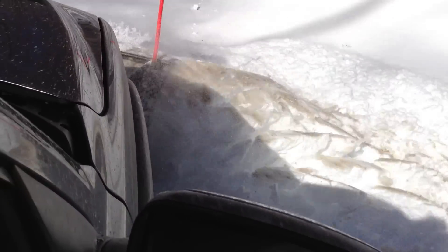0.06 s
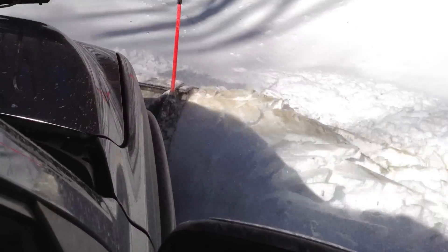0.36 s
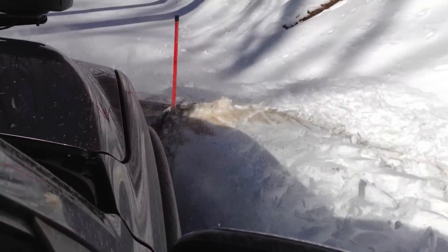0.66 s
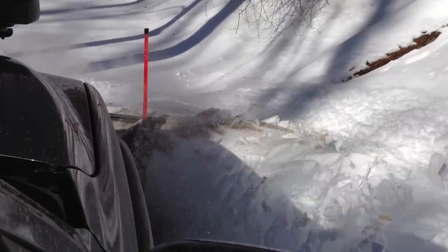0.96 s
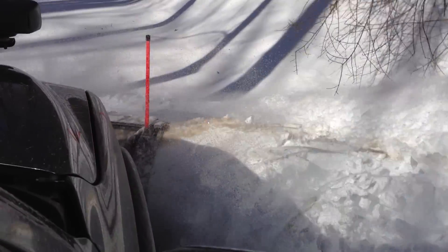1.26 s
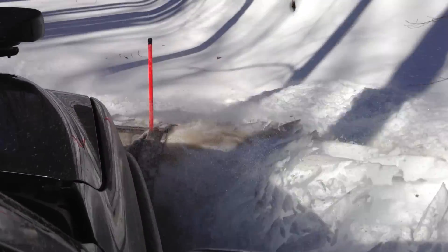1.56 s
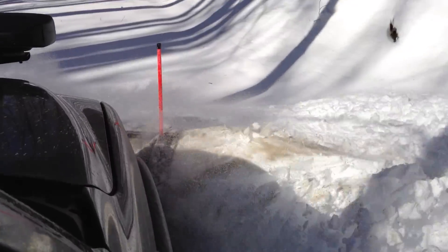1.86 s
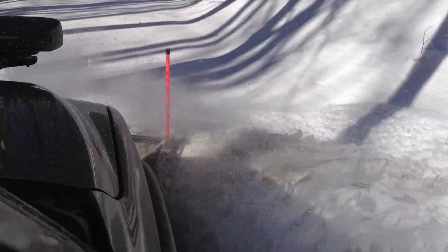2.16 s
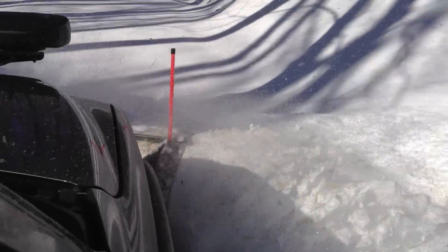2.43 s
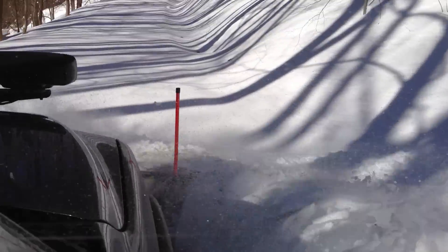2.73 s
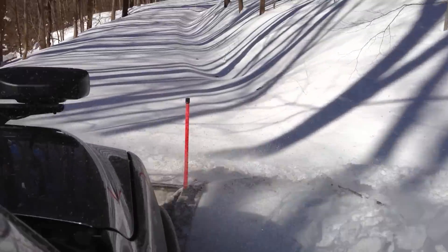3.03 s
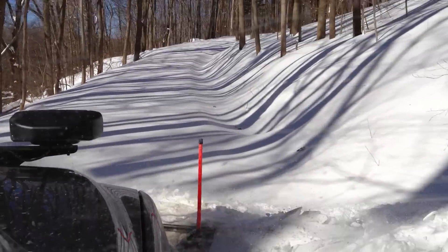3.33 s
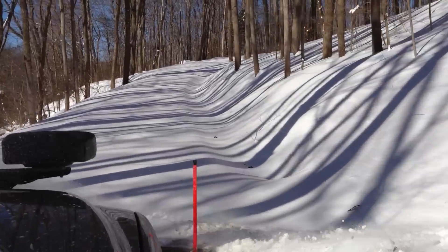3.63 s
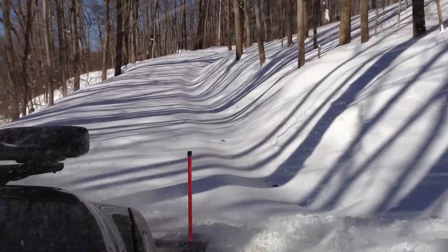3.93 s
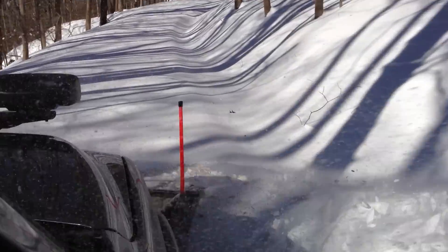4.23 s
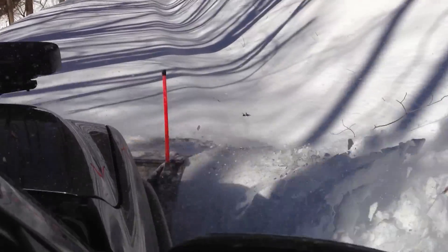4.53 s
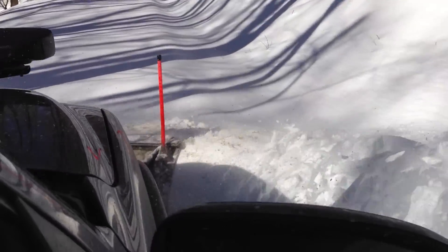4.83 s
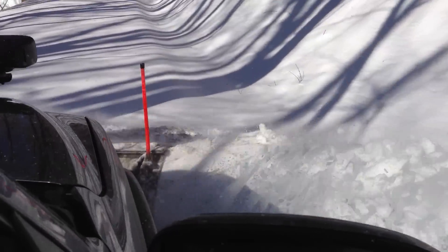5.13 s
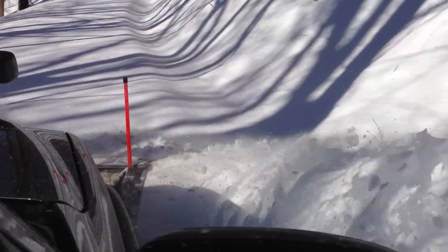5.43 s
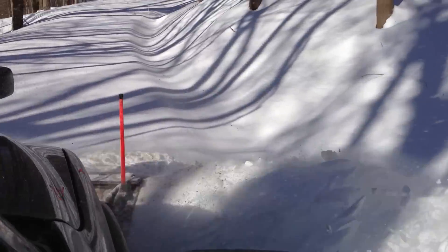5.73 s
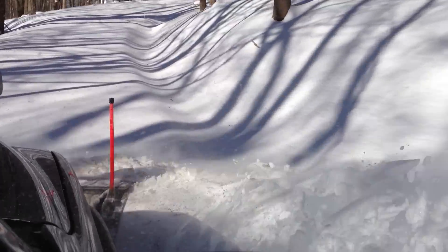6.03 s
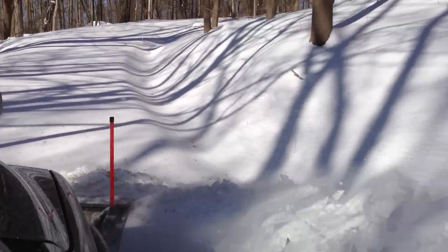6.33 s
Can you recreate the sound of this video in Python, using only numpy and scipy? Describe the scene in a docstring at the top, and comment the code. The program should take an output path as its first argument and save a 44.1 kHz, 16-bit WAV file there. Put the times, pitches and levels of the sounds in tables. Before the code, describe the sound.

A diesel pickup pushes snow, heard outdoors from its open side window. The engine drones and clatters under a faint, very high turbo whistle, while snow hisses and crumbles steadily off the blade. Wind rumbles and puffs on the microphone throughout. Midway the engine speeds up and flung bits of ice click sharply on the microphone. Near the end the drone swells under load, with a low thud.

```python
"""A diesel pickup pushes snow along a track, heard from its open side window.
The engine drones and clatters under a rising turbo whistle; jolts thud through the body.
Snow rushes and crumbles off the blade. Air buffets the microphone, flung ice grains and
clods tick on it, and a limiter ducks after each hard peak."""
import sys
import numpy as np
from scipy import signal
from scipy.fft import rfft, irfft
from scipy.io import wavfile
from scipy.ndimage import uniform_filter1d, minimum_filter1d

SR = 44100
rng = np.random.default_rng(int(sys.argv[2]) if len(sys.argv) > 2 else 0)


def transcribe(signal):
    """Save signal, clipped to [-1, 1], as a 16-bit WAV file at the path in sys.argv[1]."""
    frames = np.atleast_2d(signal).T
    limited = np.clip(frames, -1, 1)
    pcm = np.round(limited * 32767).astype(np.int16)
    wavfile.write(sys.argv[1], SR, pcm)


N = 290619
TIME = np.arange(N) / SR

# air flow past the window: t/s, level/dB
AIRFLOW = [(0, -25), (0.3, -22.5), (0.85, -23.5), (1.5, -26.5), (1.75, -22.5), (2.2, -25), (2.5, -27.5),
           (2.75, -23), (3.15, -22), (3.65, -18.5), (3.95, -20), (4.28, -24), (4.38, -20.5), (4.5, -17.5),
           (4.62, -22.5), (4.85, -23), (5.35, -17), (5.72, -16.5), (5.85, -19), (6.59, -16)]


def engine(wobble=0.0045):
    """Eight-cylinder diesel: one wavering firing rate drives drone and clatter."""
    # engine run: t/s, firing rate/Hz, drone level/dB, clatter level/dB
    run = [(0, 128.1, -30.5, -31), (1.25, 129.8, -29, -35.5), (1.6, 130.5, -30.5, -36.5),
           (2.3, 130.8, -32, -34), (2.8, 141.5, -29, -35), (3.4, 149.6, -26.5, -32.5),
           (3.78, 148.3, -22.5, -33.5), (3.94, 146.3, -29, -35), (4.3, 144, -31.5, -31.5),
           (4.7, 145.6, -32, -30), (5.02, 150.6, -20, -29), (5.2, 152.6, -23, -33),
           (5.48, 154.3, -17, -28.5), (5.74, 155, -13, -26), (5.95, 156, -17.5, -33.5),
           (6.17, 152.9, -15.5, -29), (6.38, 149.7, -22, -33), (6.59, 147.9, -23, -39)]
    firing_hz, drone_db, clatter_db = in_time(run)
    firings = np.cumsum(firing_hz * (1 + wobble * drift(7.84))) / SR
    return drone(firings, drone_db) + from_db(clatter_db) * clatter(firings, firing_hz)


def drone(firings, level_db, full_load_db=-12.5, boom_hz=178.7, boom_width_hz=69):
    """Low exhaust orders over a booming cab; under heavy load the boom yields to the note."""
    # exhaust and crank tones: f/firing rate, level/dB
    orders = [(.875, -16), (1, 0), (1.125, -22), (1.25, -11), (1.5, -17), (1.75, -15), (2, -19)]
    tones = sum(from_db(db + 1.5 * drift(5)) * np.sin(2 * np.pi * (order * firings + rng.random()))
                for order, db in orders)
    cab = resonate_twice(rng.standard_normal(N), boom_hz, boom_width_hz)
    load_db = level_db - full_load_db
    note_db = 3 + 1.8 * drift(14) + 0.45 * load_db
    boom_db = 4 - 0.45 * np.maximum(load_db + 10, 0)
    note = from_db(note_db) * rms_one(tones)
    boom = from_db(boom_db) * rms_one(cab) * lulls()
    return from_db(level_db) * (note + boom)


def clatter(firings, firing_hz, cylinders=8, repeat_share=0.55, decay_per_firing=0.88, size=512):
    """Each cylinder knocks with its own strength and grain, ringing block and panels; unit power."""
    # block and panel resonances: f/Hz, width/Hz, level/dB
    modes = [(672, 63, 11), (874, 160, 5.5), (1425, 86, 10), (1517, 200, 6), (1756, 51, 9),
             (2387, 92, -1.5), (2757, 140, 4.5), (3070, 220, 0.5), (4470, 1900, -10.5)]
    cylinder = firings.astype(int) % cylinders
    age_samples = np.minimum((firings % 1 / firing_hz * SR).astype(int), size - 1)
    own = rng.standard_normal((cylinders, size))[cylinder, age_samples]
    strength = from_db(3.5 * rng.standard_normal(cylinders))[cylinder]
    grain = np.sqrt(repeat_share) * own + np.sqrt(1 - repeat_share) * rng.standard_normal(N)
    knocks = strength * grain * np.exp(-decay_per_firing * (firings % 1))
    return rms_one(sum((-1) ** k * from_db(db + 2.2 * drift(0.8)) * resonate(knocks, hz, width_hz)
                       for k, (hz, width_hz, db) in enumerate(modes)))


def turbo(hiss_db=-54.5, fade_depth=0.5, fades_per_s=9):
    """The compressor's blade tone blurs with speed and fades in moving air, over intake hiss."""
    # blade tone: t/s, f/Hz
    blade_tone = [(0.0, 9231), (1.15, 10065), (1.85, 9948), (2.29, 10011), (2.62, 10284), (3.41, 11565),
                  (3.78, 11852), (4.15, 10911), (4.29, 10877), (4.42, 11083), (5.17, 13122), (5.51, 13986),
                  (5.82, 14481), (6.0, 14634), (6.17, 14568), (6.59, 14094)]
    # whistle surges: t/s, level/dB
    surges = [(0, -49), (0.29, -58), (0.42, -49), (0.62, -59), (0.87, -43), (1.0, -51), (1.5, -58),
              (1.85, -51), (2.25, -59), (2.49, -61), (2.53, -44), (2.62, -50), (2.74, -56), (3.08, -48),
              (3.4, -53), (3.77, -45), (3.92, -51), (4.28, -47), (4.36, -57), (4.51, -46), (4.58, -52),
              (4.72, -45), (4.8, -56), (4.86, -47), (4.97, -49), (5.3, -54), (5.8, -56), (6.15, -53),
              (6.5, -49)]
    hz, = in_time(blade_tone)
    level_db, = in_time(surges)
    blur = 0.00106 * (hz / hz.min()) ** 1.8 * drift(67)
    phase = 2 * np.pi * np.cumsum(hz * (1 + blur)) / SR
    in_phase = (1 + fade_depth * drift(fades_per_s)) * np.sin(phase)
    quadrature = fade_depth * drift(fades_per_s) * np.cos(phase)
    intake = rms_one(resonate(rng.standard_normal(N), 13400, 3200)) * hz / hz.max()
    return from_db(level_db) * rms_one(in_phase + quadrature) + from_db(hiss_db) * intake


def snow(gain_db=-4.0, crumble_db=-6.0, snaps_per_s=1500):
    """Powder hisses along the blade while the crust breaks in surges of tiny snaps."""
    # snow on the blade: t/s, level/dB
    rush = [(0, -28), (0.4, -27), (0.75, -28.5), (1.29, -26), (1.335, -25), (1.36, -27.5), (1.5, -28.5),
            (2.0, -28), (2.3, -28), (2.75, -26), (3.1, -25.5), (3.55, -24.5), (3.95, -27.5), (4.28, -23.5),
            (4.4, -27.5), (4.75, -26), (5.3, -27.5), (5.55, -26), (5.72, -26.5), (5.85, -27.5),
            (6.35, -29.5), (6.59, -29)]
    # snow spectrum: f/Hz, level/dB
    spectrum = [(300, 4.5), (1000, 7.5), (1600, 5), (2150, 1.5), (2850, 2), (3600, -4), (4900, -4),
                (6500, -11), (9000, -16), (12500, -20.5), (15500, -28)]
    rush_db, = in_time(rush)
    surge_db = 2 * drift(14)
    breaks = rng.random(N) < snaps_per_s * from_db(surge_db) / SR
    sizes = from_db(0.3 * surge_db + 2.2 * np.minimum(rng.exponential(1, N), 4))
    snaps = breaks * sizes * rng.choice([-1, 1], N)
    powder = rng.standard_normal(N) * from_db(0.98 * drift(44))
    return from_db(rush_db + gain_db) * colour(powder + from_db(crumble_db) * rms_one(snaps), spectrum)


def wind(gain_db=-2.5, crunch_db=-15.5):
    """The finest eddies make a lumpy rumble with lulls; the strongest lumps crunch."""
    # rumble spectrum: f/Hz, level/dB
    spectrum = [(25, -39), (60, -38), (90, -13), (125, -4.5), (185, -7.5), (260, 0), (370, -3.5), (520, -3),
                (750, -7.5), (1100, -19), (1600, -23.5), (3000, -60)]
    wind_db, = in_time(AIRFLOW)
    lumps = from_db(2.5 * np.minimum(drift(40), 1.5))
    rumble = colour(rng.standard_normal(N) * lumps * lulls(), spectrum)
    crunch = resonate_twice(rng.standard_normal(N) * lumps ** 2, hz=1100, width_hz=1300)
    return from_db(wind_db + gain_db) * (rumble + from_db(crunch_db) * rms_one(crunch))


def buffets(gain_db=-9.5, rise_ratio=0.82, hollow=0.55, rasp_db=-28.5, size=4096):
    """Each eddy is a hollow swell round one pressure kick; strong ones rasp at their crests."""
    # large eddies striking the microphone: t/s, level/dB, nominal length/s, f/Hz
    large_eddies = [(0.006, 1, 0.0055, 368), (0.11, -2, 0.0068, 198), (0.213, -10, 0.0091, 292),
                    (0.234, -6.5, 0.0072, 327), (0.268, -2, 0.002, 600), (0.303, -8, 0.0054, 760),
                    (0.338, -6, 0.015, 300), (0.388, -5, 0.011, 460), (0.473, -0.5, 0.0066, 216),
                    (0.5, -1, 0.0096, 237), (0.583, -5.5, 0.033, 207), (0.656, -0.5, 0.011, 300),
                    (0.763, -7, 0.016, 403), (0.818, -6.5, 0.0089, 363), (1.005, -5.5, 0.0032, 410),
                    (1.133, -5.5, 0.007, 586), (1.24, -8, 0.018, 408), (1.318, -14, 0.012, 510),
                    (1.332, 2.5, 0.012, 280), (1.406, -8, 0.024, 393), (1.476, 2.5, 0.008, 340),
                    (1.573, -0.5, 0.0058, 193), (1.662, 1, 0.0035, 324), (1.804, -2, 0.013, 445),
                    (1.863, -7, 0.0065, 448), (1.882, -8.5, .016, 250), (1.965, -2.5, 0.004, 314),
                    (1.977, -2, 0.005, 388), (2.01, 0.5, 0.01, 248), (2.041, -5, 0.007, 397),
                    (2.072, -4.5, 0.015, 464), (2.159, 2, 0.0049, 537), (2.292, -6, 0.019, 344),
                    (2.39, -7, 0.018, 340), (2.417, -4.5, 0.012, 250), (2.618, -8, 0.0075, 504),
                    (2.677, -4.5, 0.016, 490), (2.713, -7, .016, 506), (2.755, 0, 0.0043, 226),
                    (2.808, -10.5, 0.011, 560), (2.855, 1.5, 0.012, 270), (2.929, -3.5, 0.0049, 650),
                    (2.988, -6.5, 0.011, 314), (3.003, -7.5, 0.015, 517), (3.05, -22, 0.0081, 360),
                    (3.115, 4, 0.014, 342), (3.249, -1.5, 0.023, 282), (3.333, -1.5, 0.0068, 480),
                    (3.35, 4, 0.011, 374), (3.412, -3.5, 0.0089, 520), (3.459, 1.5, 0.011, 426),
                    (3.483, -4, 0.013, 550), (3.539, -2.5, 0.015, 470), (3.631, 0, 0.0092, 296),
                    (3.7, -0.5, 0.0081, 362), (3.726, -7, 0.0083, 300), (3.789, -3, 0.016, 264),
                    (3.864, -3.5, 0.014, 237), (3.997, -1.5, 0.017, 408), (4.085, -0.5, 0.012, 224),
                    (4.123, -4.5, 0.0055, 260), (4.144, -4.5, 0.0058, 750), (4.162, -0.5, 0.021, 250),
                    (4.21, -0.5, 0.029, 220), (4.255, -0.5, 0.024, 350), (4.309, 0.5, 0.021, 232),
                    (4.332, 8.5, 0.0042, 394), (4.418, -7, 0.017, 200.2), (4.698, -4, 0.013, 520),
                    (4.755, -2, 0.016, 192), (4.904, 2.5, 0.0091, 340.6), (4.984, -4, 0.017, 257),
                    (5.017, 0, 0.009, 201.1), (5.049, -15, 0.019, 300), (5.134, 6.5, 0.013, 230),
                    (5.263, 4, 0.0062, 402), (5.303, -7, 0.0076, 239), (5.363, 5.5, 0.009, 290),
                    (5.51, 3, 0.01, 203), (5.528, 2.5, 0.0087, 257.4), (5.567, 0, .009, 240.3),
                    (5.618, 0, 0.014, 245.1), (5.674, 1, 0.0048, 362), (5.74, 4.5, 0.011, 225),
                    (5.766, 6.5, 0.0088, 516), (5.84, 4.5, 0.022, 184.2), (5.889, 4, 0.018, 198),
                    (5.954, 2, 0.0062, 362.2), (5.995, 1.5, 0.012, 300), (6.077, -2, 0.012, 237),
                    (6.143, 7, 0.011, 178), (6.18, 6.5, 0.013, 177), (6.219, 0.5, 0.008, 300),
                    (6.269, -3, 0.0091, 340), (6.367, 3.5, 0.013, 348.8), (6.455, -5, 0.015, 418.4),
                    (6.575, -4.5, 0.0066, 400)]
    # eddy spectrum: f/Hz, level/dB
    spectrum = [(25, -38), (70, -50), (105, -7.5), (160, 1.5), (220, 3), (380, -5.5), (520, -6.5),
                (750, -16), (1100, -21.5), (1550, -26.5), (2200, -33.5), (4500, -41.5), (12000, -103)]
    out = np.zeros(N + 2 * size)
    t = (np.arange(size) - size // 2) / SR
    for at_s, level_db, length_s, hz in large_eddies + small_eddies():
        tilt = 1.5 + 4.5 * np.log2(hz / 300) + 0.043 * level_db  # higher or stronger: brighter
        width_s = 0.97 * length_s * np.where(t < 0, rise_ratio, 1)
        swirl = rng.standard_normal(size) / (1 + (t / width_s) ** 2) ** 2
        churn = colour(swirl, spectrum, tilt)
        kick = colour(rng.choice([-1, 1]) * (t == 0), spectrum, tilt - 3)
        puff = rms_one(churn + 0.52 * (0.011 / length_s) ** 0.72 * kick)  # shorter: more kick
        puff += hollow * rms_one(resonate(puff, hz, 0.25 * hz))
        puff = from_db(level_db + gain_db) * rms_one(puff) * np.sqrt(length_s * SR / size)
        rasp_noise = rms_one(resonate(rng.standard_normal(size), 1280, 570))
        rasp = from_db(rasp_db) * puff * np.tanh(2 * puff) * rasp_noise
        start = int(at_s * SR) + size // 2
        out[start:start + size] += puff + rasp
    return out[size:size + N]


def small_eddies(count=36, spread_db=10.0, mid_length_s=0.0085, mid_hz=300, spread_octaves=0.6):
    """Eddies shed at loose intervals, stronger in stronger wind: t/s, level/dB, length/s, f/Hz."""
    wind_db, = in_time(AIRFLOW)
    place, strength, length, pitch = rng.random((count, 4)).T
    at_s = (np.arange(count) + place) / count * N / SR
    flow_db = wind_db.mean() + 0.4 * (np.interp(at_s, TIME, wind_db) - wind_db.mean())
    level_db = flow_db + 1.5 + spread_db * (2 * strength - 1)
    hz = mid_hz * 2 ** (spread_octaves * (2 * pitch - 1))
    return list(zip(at_s, level_db, mid_length_s * (0.5 + length), hz))


def ticks(size=256):
    """A grain gives one push and pull of pressure, shorter if smaller, gritty as it shatters."""
    # ice grains and clods striking the microphone: t/s, peak level/dB, f/Hz, grit share
    strikes = [(0.267, -15, 900, .03), (0.303, -20, 1190, .05), (0.656, -13, 900, .03),
               (1.238, -14, 1300, .03), (1.332, -12, 2630, .03), (1.338, -14.5, 2890, .03),
               (1.4057, -9, 1490, .03), (1.864, -14, 895, .05), (2.158, -18, 1000, .03),
               (3.3872, -1, 2580, 0.039), (3.4495, -12, 5500, .07), (3.478, -0.5, 1140, .02),
               (3.485, 8.5, 1580, 0.03), (3.6867, -3.5, 6400, 0.059), (3.6868, -2, 2430, 0.066),
               (3.942, -19, 5000, .07), (4.035, -11, 4600, .3), (4.144, -5.5, 2660, .02),
               (4.144, -10.5, 1100, .02), (4.1505, -10, 4200, .05), (4.333, -1, 1720, .01),
               (4.352, -13, 6950, .1), (4.379, -18, 6520, .1), (4.521, -6.5, 2580, .03),
               (4.537, 10.5, 3090, .16), (4.542, 2.5, 1498, .02), (4.6173, -2.5, 2560, .02),
               (4.903, -8, 900, .03), (5.263, -10, 900, .03), (5.363, -10, 998, 0.037),
               (5.652, -7.5, 2720, .03), (5.7663, 3, 1080, 0.02), (5.769, -6, 1500, 0.027),
               (6.4903, 8, 3070, .2)]
    out = np.zeros(N)
    for at_s, peak_db, hz, grit in strikes:
        phase = 2 * np.pi * hz * (np.arange(size) - size // 2) / SR
        pulse = phase * np.exp(-phase ** 2 / 2)
        pulse += grit * rng.standard_normal(size) * np.exp(-np.abs(phase) / 2)
        start = int(at_s * SR) - size // 2
        out[start:start + size] -= from_db(peak_db) * pulse / np.abs(pulse).max()
    return out


def jolts(hz=86, half_width_s=0.01, waver=0.071):
    """Each jolt shakes the body for a few slow cycles."""
    # body thuds: t/s, level/dB
    thuds = [(0.43, -38), (0.57, -37), (2.698, -37), (2.85, -35), (3.12, -30), (4.3, -38), (5.47, -32),
             (5.595, -19), (6.18, -32), (6.44, -35)]
    swell = sum(from_db(db) * np.exp(-((TIME - at_s) / half_width_s) ** 2) for at_s, db in thuds)
    phase = 2 * np.pi * np.cumsum(hz * (1 + waver * drift(22))) / SR
    return swell * np.sqrt(2) * np.sin(phase)


def lulls(depth_db=3.0, rate_hz=12):
    """A gain that sinks and swells at random; unit power."""
    return rms_one(from_db(depth_db * np.minimum(drift(rate_hz), 1)))


def drift(rate_hz):
    """Smooth unit-power noise that changes about rate_hz times a second."""
    hop, settle = 40, 2000
    pole = np.exp(-2 * np.pi * hop * rate_hz / SR)
    noise = rng.standard_normal(N // hop + settle + 2)
    slow = signal.lfilter([1], [1, -2 * pole, pole ** 2], noise)[settle:]
    return np.interp(np.arange(N) / hop, np.arange(len(slow)), rms_one(slow))


def colour(x, spectrum, tilt_db_per_octave=0):
    """Shape x by a spectrum, tilted between 150 and 1200 Hz; unit power."""
    octave = np.log2(np.fft.rfftfreq(len(x), 1 / SR) + 1)
    hz, db = np.transpose(spectrum)
    shape_db = np.interp(octave, np.log2(hz), db)
    shape_db += tilt_db_per_octave * np.clip(octave, np.log2(150), np.log2(1200))
    return rms_one(irfft(rfft(x) * from_db(shape_db), len(x)))


def resonate(x, hz, width_hz):
    """Two-pole resonance, unit peak gain."""
    radius = np.exp(-np.pi * width_hz / SR)
    feedback = [1, -2 * radius * np.cos(2 * np.pi * hz / SR), radius ** 2]
    return signal.lfilter(np.array([1, 0, -1]) * (1 - radius ** 2) / 2, feedback, x)


def resonate_twice(x, hz, width_hz):
    """Two equal resonances in series."""
    return resonate(resonate(x, hz, width_hz), hz, width_hz)


def in_time(rows):
    """Each value column of a time table, per sample."""
    at_s, *columns = np.transpose(rows)
    return [np.interp(TIME, at_s, column) for column in columns]


def from_db(db):
    """Decibels to gain."""
    return 10 ** (np.asarray(db) / 20)


def rms_one(x):
    """Scale to unit power."""
    return x / np.sqrt(np.mean(x ** 2) + 1e-20)


def scene():
    """Truck, snow and air at one microphone."""
    air = wind() + buffets()
    return (engine() + jolts() + turbo() + snow() + air + ticks())[None]


def record(dry, low_cut_hz=34, ceiling=0.68, release_s=0.34, high_cut_hz=16200):
    """Low cut, a limiter that ducks at once and recovers slowly, then high cut."""
    sound = signal.sosfilt(signal.butter(2, low_cut_hz, "high", fs=SR, output="sos"), dry)
    over_db = np.maximum(20 * np.log10(np.abs(sound[0]) / ceiling + 1e-9), 0)
    release = np.exp(-TIME / release_s)
    duck_db = np.maximum.accumulate(over_db / release) * release
    gain = uniform_filter1d(minimum_filter1d(from_db(-duck_db), size=45), size=45)  # 1 ms attack
    return signal.sosfilt(signal.cheby2(16, 60, high_cut_hz, fs=SR, output="sos"), sound * gain)


dry = scene()
out = record(dry)
transcribe(out)
```